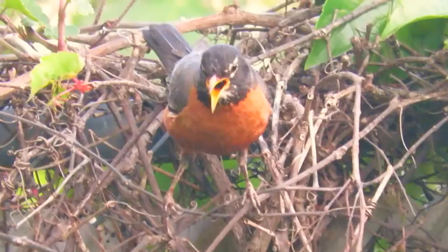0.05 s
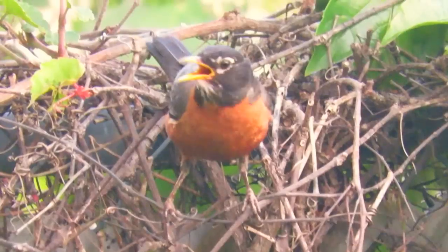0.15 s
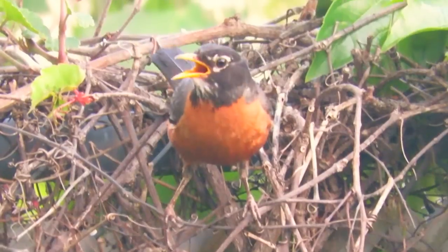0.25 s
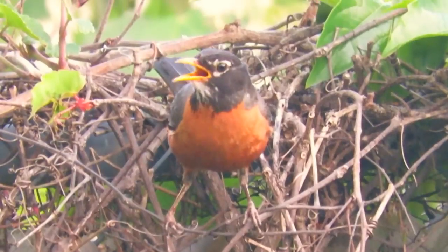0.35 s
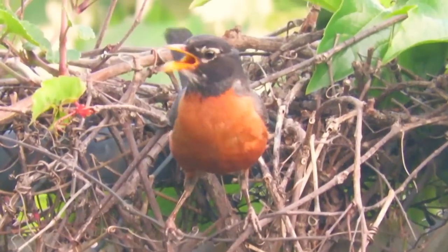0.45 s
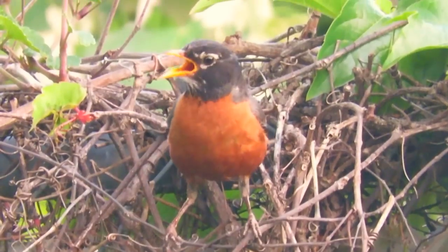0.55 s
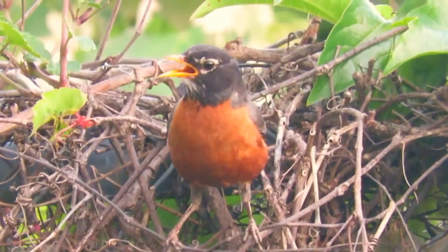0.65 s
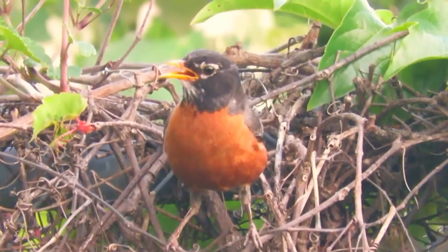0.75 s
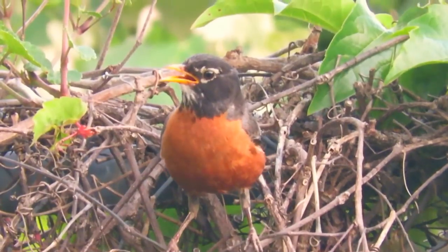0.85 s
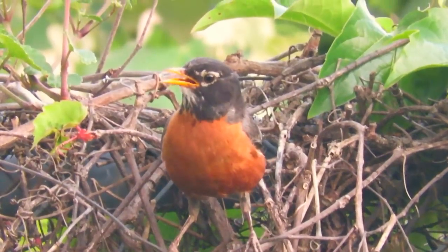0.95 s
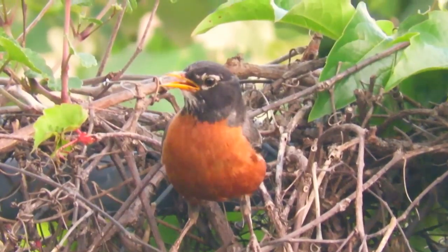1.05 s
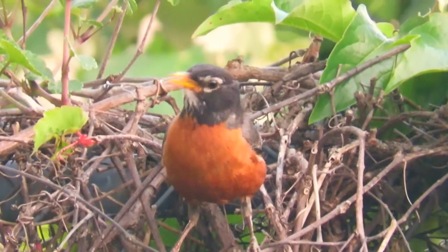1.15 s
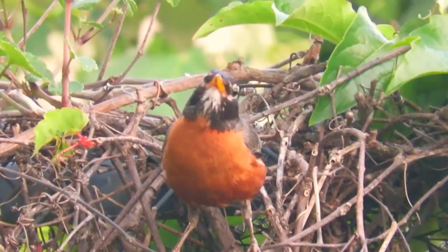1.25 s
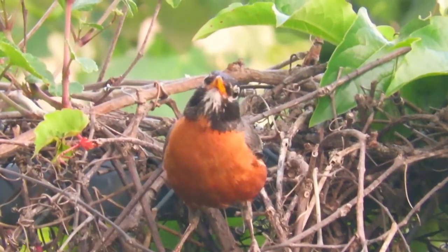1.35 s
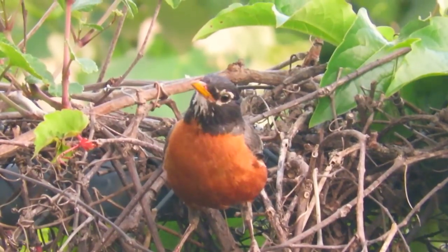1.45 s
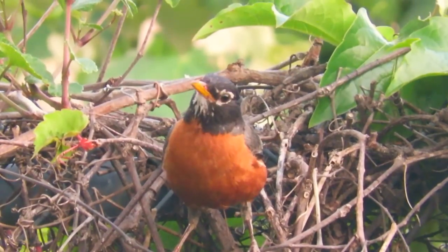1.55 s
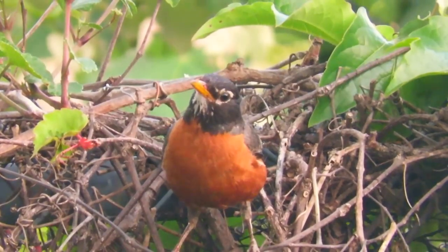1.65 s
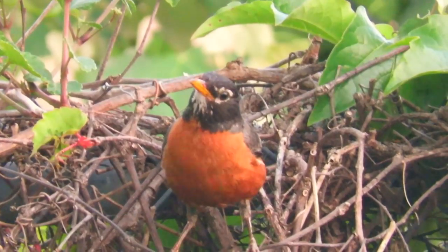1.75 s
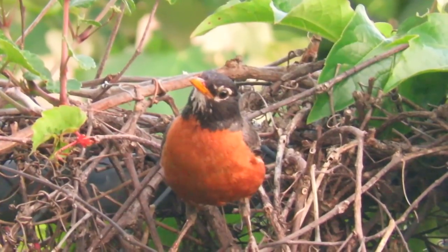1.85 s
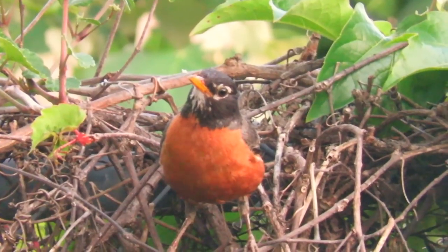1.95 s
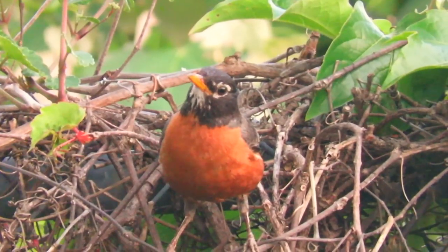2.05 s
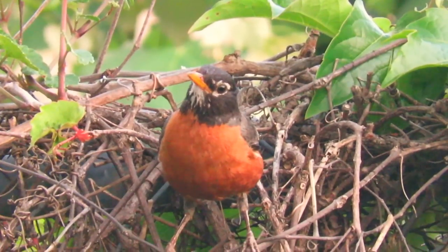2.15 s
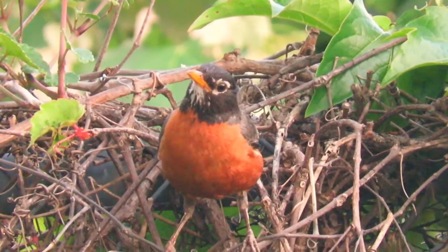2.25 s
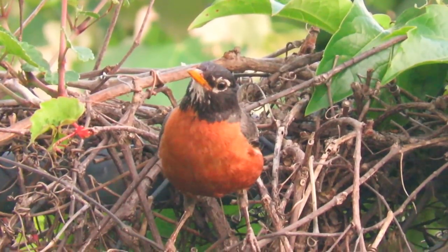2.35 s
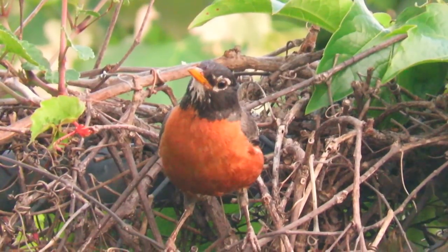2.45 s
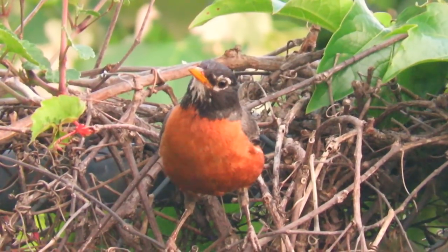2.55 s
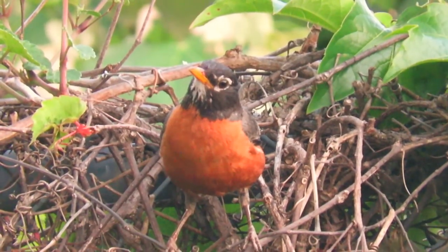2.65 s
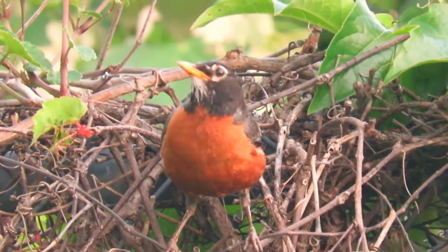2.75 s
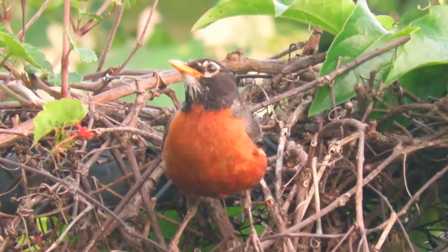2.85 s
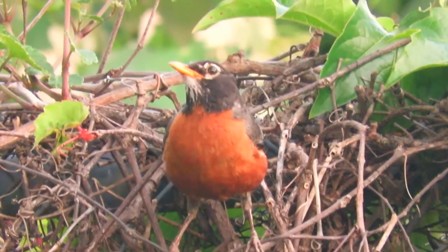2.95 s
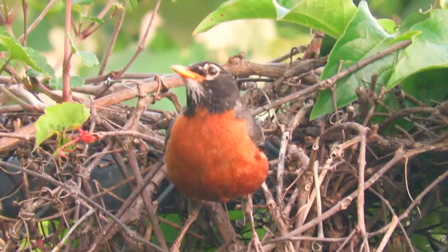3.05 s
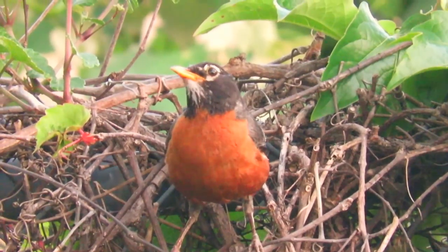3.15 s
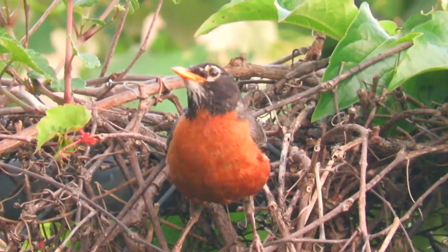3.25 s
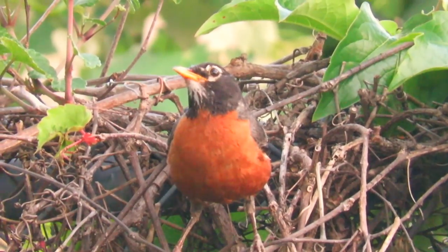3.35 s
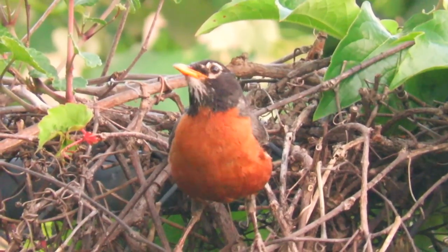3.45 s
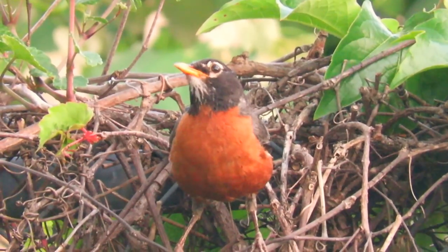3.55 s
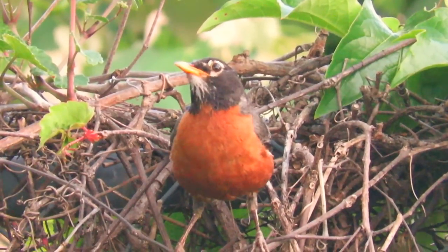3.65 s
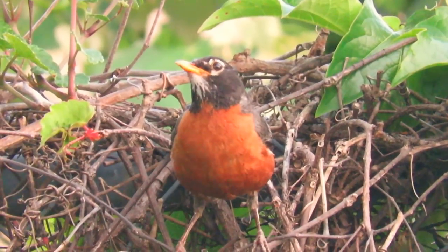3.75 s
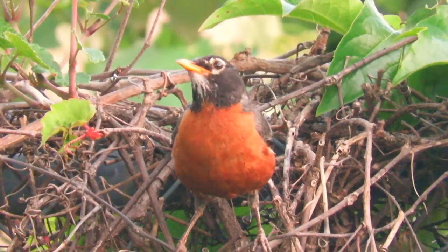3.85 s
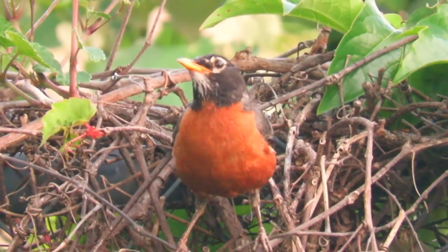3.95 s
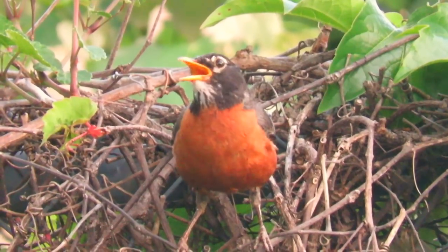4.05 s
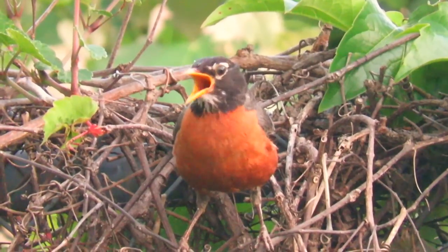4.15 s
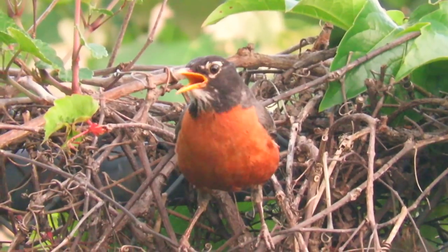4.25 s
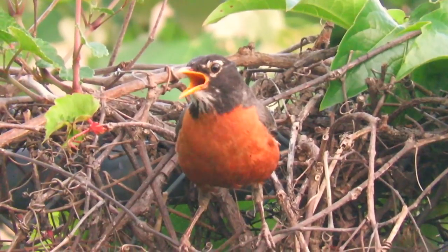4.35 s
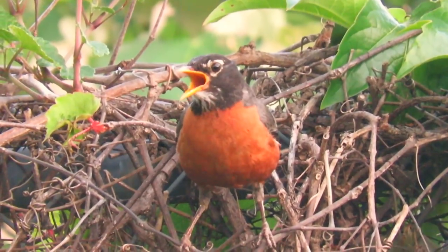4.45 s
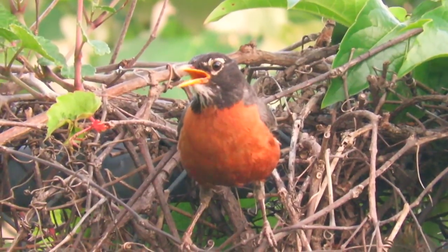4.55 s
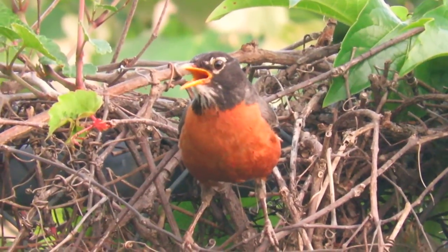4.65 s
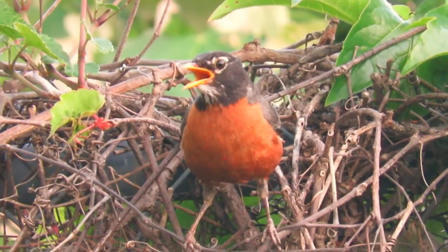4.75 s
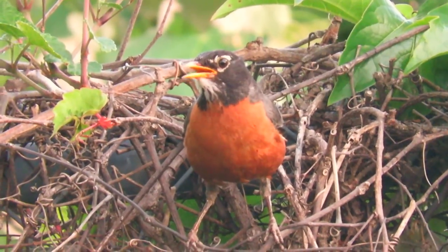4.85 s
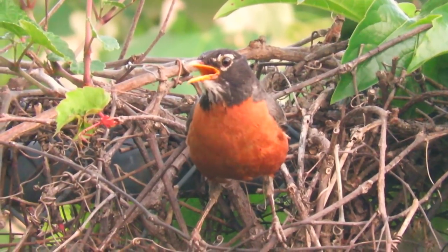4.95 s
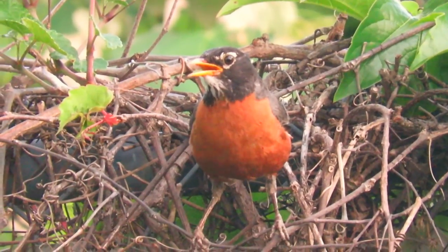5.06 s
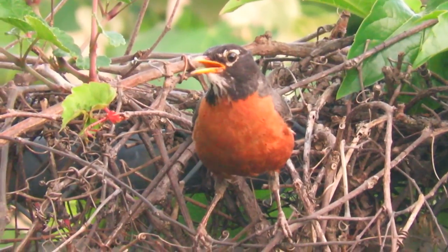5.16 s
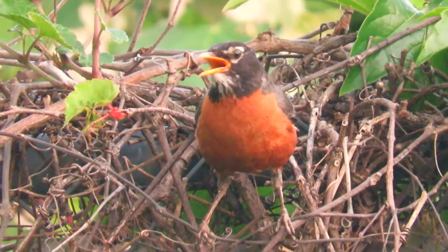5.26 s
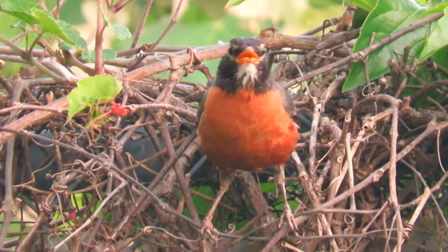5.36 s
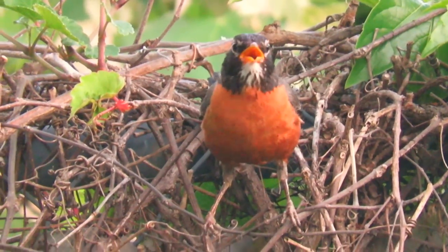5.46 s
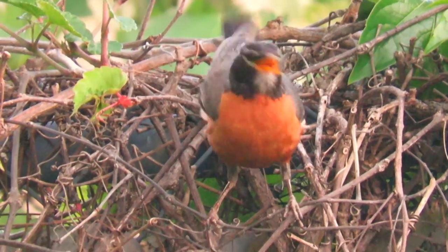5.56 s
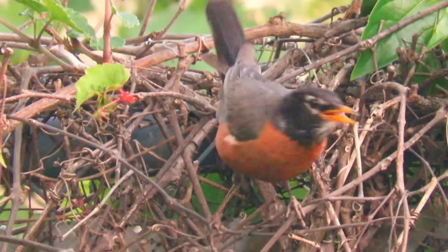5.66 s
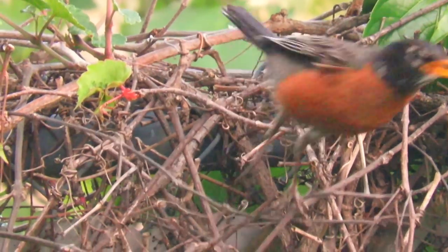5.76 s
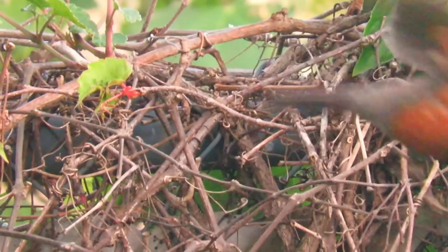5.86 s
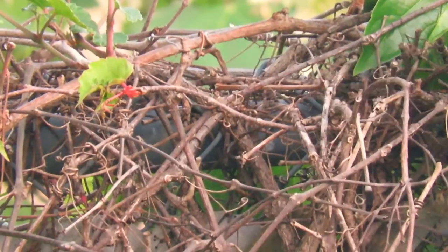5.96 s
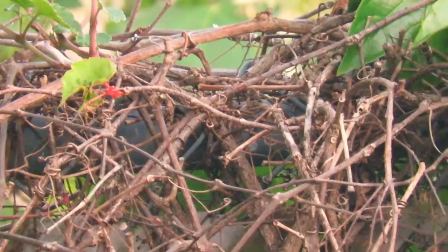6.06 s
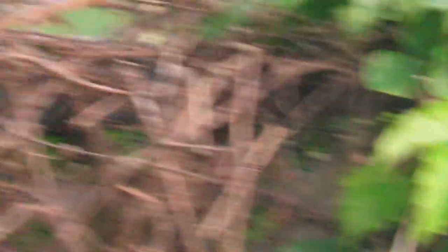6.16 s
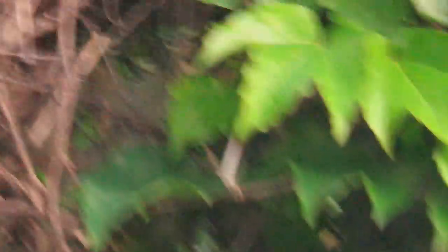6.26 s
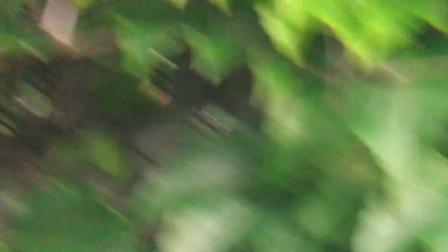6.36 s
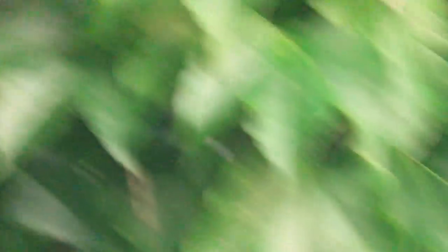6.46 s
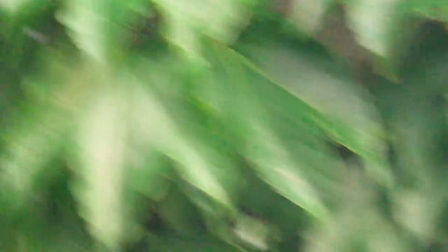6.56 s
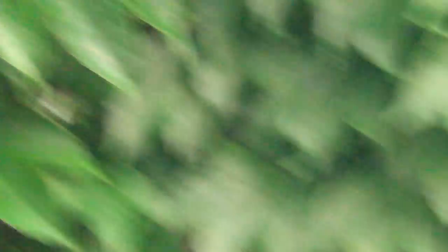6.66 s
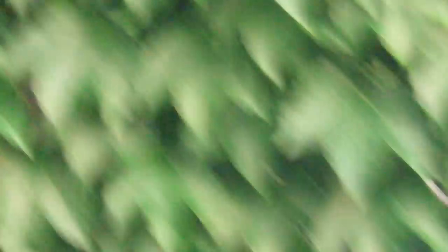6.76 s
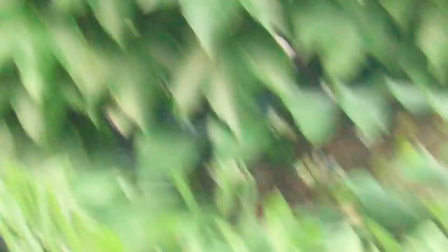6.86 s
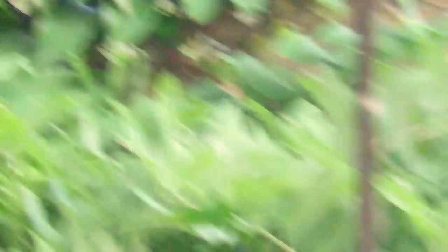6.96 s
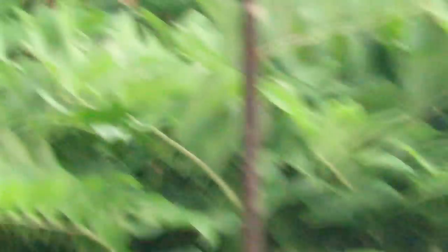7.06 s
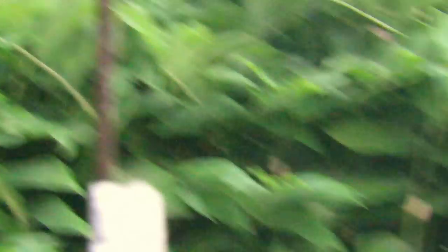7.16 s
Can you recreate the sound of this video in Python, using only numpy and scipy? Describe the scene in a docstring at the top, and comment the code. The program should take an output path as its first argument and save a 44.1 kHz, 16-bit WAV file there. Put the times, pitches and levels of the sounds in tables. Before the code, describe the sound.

A low wash of distant traffic, a machine hum and a very faint insect run throughout in a small walled yard. Right from the start, a robin a few metres away gives about eleven sharp, slightly hoarse chucks, roughly eight a second, fading by 1.3 seconds. From 1.4 to 4.1 seconds only faint chirps and thin whistles of far birds rise from the background, with a tiny tick on the camera near 3.6. At 4.2 seconds the robin starts about thirteen shrill, raspy shrieks, a little slower, weakening toward 6.1 seconds. The notes carry short, light reflections from twigs and wall. Two softer, lower clucks follow at about 6.3 and 6.7 seconds. Small ticks and a light thud on the camera body come around 6.4 to 6.5 seconds, and a faint lens motor hiss continues until the end, just after 7 seconds.

```python
"""A walled yard, a few metres from a tangle of vines. A robin gives a run of chucks and a run of
shrieks, flies off and clucks twice. The two membranes of its voice box oscillate at once, each a
gliding tone with harmonics. A broad, hissy rasp lies within each note; twigs, ground and wall
reflect the notes. Traffic wash, a machine hum, an insect and far birds lie beneath. A camera body
is knocked lightly, and its lens motor hisses at the end."""
import sys
import numpy as np
from scipy import signal
from scipy.fft import rfft, irfft
from scipy.io import wavfile
from scipy.ndimage import uniform_filter1d

SR = 44100
rng = np.random.default_rng(int(sys.argv[2]) if len(sys.argv) > 2 else 0)


def dump_mix(stems):
    """Bounce the given channels to the path in sys.argv[1] as a 16-bit WAV at rate SR."""
    frames = np.atleast_2d(stems).T  # one column per channel
    limited = np.clip(frames, -1, 1)  # hard clip at full scale
    pcm = np.round(limited * 32767).astype(np.int16)
    wavfile.write(sys.argv[1], SR, pcm)


N = 317961

# traffic spectrum: (frequency [Hz], relative density [dB])
TRAFFIC = [(15, -44.5), (25, -22.5), (59, 0), (169, -9), (198, -3), (233, -13), (267, -6.5), (445, -19),
           (762, -14), (1380, -20.5), (2060, -25), (2850, -27), (3440, -30.5), (13200, -49), (15500, -81)]
# likeness of left and right in the wash: (frequency [Hz], correlation [-1 to 1])
COHERENCE = [(60, 1.0), (180, 0.98), (550, 0.74), (1650, 0.77), (4970, -0.18), (15000, -1.01)]
# colour the wash takes on as the camera swings round: (frequency [Hz], gain [dB])
TURNED_COLOUR = [(30, 6), (200, -3), (400, 8), (600, -6.5), (1100, -3.5), (2000, -1.5), (8000, 1.5)]
# progress of that change: (time [s], share [0-1])
TURN = [(6.3, 0), (6.6, .3), (6.8, .8), (7.21, 1)]
# machine lines, then the insect: (frequency [Hz], width [Hz], level [dB], steady share [0-1])
HUM_LINES = [(56.8, 8.3, -49.5, 0.54), (118, 10.2, -51, 0.55), (237, 5.3, -50, 0.67),
             (354.6, 11.6, -61, 0.29), (815, 14, -61, 0.23), (1359, 16.3, -61, 0.36), (2858, 91, -64.5, 0)]

# note shapes, one curve a membrane: (time in note [s], base pitch [Hz], relative level [dB])
CHUCK = [
    [(0, 1960, -16), (.010, 2240, -16), (.021, 2400, -19), (.026, 2607, -6), (.032, 2700, -4),
     (.043, 2740, 0), (.050, 2720, -6), (.056, 2640, -18)],
    [(.006, 2460, -26), (.018, 3300, -19.5), (.024, 3846, -13.5), (.031, 4080, -15), (.042, 3440, -17),
     (.052, 2400, -14), (.058, 1880, -14)],
]
SHRIEK = [
    [(0, 1700, -22), (.012, 2050, -20), (.016, 2740, -9), (.032, 2800, -2)],
    [(.018, 2500, -26), (.031, 3000, -26), (.037, 4250, 0), (.042, 4390, 1), (.049, 4420, 0),
     (.056, 4340, -6), (.061, 4000, -1), (.065, 3760, -2), (.076, 3580, -8), (.079, 2800, 1),
     (.085, 2500, -6), (.094, 1850, -24)],
]
CLUCK = [
    [(0, 1804, -13), (.012, 1920, 12), (.022, 1830, -2), (.040, 1290, 9)],
    [(0, 2420, -3), (.010, 3080, -8), (.018, 3250, -7), (.030, 2564, -1), (.040, 2000, -31)],
]
# the second harmonic shifts from an opening level to a later one, usually weaker; one row a membrane:
# (time of shift [s], opening base level [dB], later base level [dB])
CHUCK_SHIFT = [(0.0225, 9.5, -41.5), (0.0075, -53, -26)]
SHRIEK_SHIFT = [(0.017, -8, -24.5), (0.036, 11, -30)]
CLUCK_SHIFT = [(.005, -12, -31), (.005, -29, -44)]
# timbre: (overtone decay [dB/s], second harmonic per treble [dB/dB], rasp gain [dB],
# second harmonic gained in flight [dB/s], pitch flutter [share], level flutter [dB])
CHUCK_TIMBRE = (120, 0.7, 3, 0, .011, 2.4)
SHRIEK_TIMBRE = (150, 0.3, -3, 24, .007, 2.8)
CLUCK_TIMBRE = (50, 0.063, 1, 0, .025, 3.2)
# notes sung: (time [s], length [factor], pitch [factor], first membrane gain [dB],
# second membrane gain [dB], treble gain [dB], growth through the note [dB])
CHUCKS = [(.030, 1.02, 0.96, -13.5, -13, -3.5, 10), (.137, 1.08, 1.0, -13.5, -12, 0.5, 6.5),
          (.256, 1.02, 1.0, -12, -13, 0.1, 6.5), (.372, 1.0, 1.0, -11.5, -11.5, 0.8, 6.5),
          (.490, 1.0, 1.0, -12, -13, -2.3, 6.5), (.609, 1.03, 0.99, -14, -14.5, -2.2, 7.5),
          (.731, 0.97, 0.99, -15.5, -14, -2, 7.5), (.854, .95, 0.99, -15, -17, -8.5, 9),
          (.979, 0.96, 0.99, -15.5, -20, -12, 9), (1.106, 0.96, 0.97, -16.5, -22, -13.5, 12),
          (1.245, 0.9, 0.92, -20, -23, -16, 12)]
SHRIEKS = [(4.186, 1.076, 0.96, -23, -18.5, 1, -2), (4.323, 1.08, 0.98, -17.5, -17, 8, .1),
           (4.467, 1.075, 0.97, -17, -17.5, 7, .1), (4.613, 1.077, 0.97, -19, -18.5, 8, 1),
           (4.761, 1.06, 0.97, -17, -18.5, 4, -0.5), (4.916, 1.06, 0.97, -20.5, -21.5, 3.5, 1),
           (5.072, 1.1, 0.97, -22.5, -24, 0, 0), (5.236, 1.11, 0.95, -22.5, -24, -2, 4),
           (5.394, 1.02, 0.94, -22.5, -23, 1.5, 6), (5.562, 1.09, 0.955, -23.5, -24, -2, 5),
           (5.727, 1.13, 0.935, -31, -29.5, -1, 12), (5.901, 1.12, .95, -33, -29, 3.5, 0),
           (6.062, 1.075, 0.95, -24, -21, 0.5, -12)]
CLUCKS = [(6.338, 1.01, .97, -41.5, -34, .1, -.3), (6.669, 1.05, .88, -50, -37, .1, 7.8)]
# beak response for the third and fourth harmonics: (frequency [Hz], gain [dB])
BEAK = [(5000, -44), (7000, -40), (8500, -43), (9700, -55), (10800, -34), (13300, -32), (14500, -46),
        (16000, -55)]
# spectra of the broad, hissy rasp and the puff in a note: (frequency [Hz], relative density [dB])
RASP = [(1500, -19), (3000, 13.5), (5000, 5), (8000, -1.5), (9700, -7.5), (12000, 1.5), (16000, -31)]
PUFF = [(9500, -16), (12000, -15), (13700, -6), (15500, -13)]
# where the bird faces: (time [s], left over right [dB])
FACING = [(0, 0), (1.3, 0), (4.2, 0), (4.8, 0), (5.1, 0.5), (6.4, -0.5)]

# early reflections: (delay [s], left gain [dB], right gain [dB])
ECHOES = [(.0018, -12, -11), (.0028, -15, -14), (.0039, -18, -16), (.0048, -17, -16), (.0054, -17, -15),
          (.0108, -22, -21)]
# colour of the scatter from twigs and leaves: (frequency [Hz], relative level [dB])
SCATTER = [(1500, 13), (2700, 7), (3600, 17), (4300, 9), (5000, 16.5), (8000, 13), (12000, 5)]
# decay of the scatter: (frequency [Hz], time to fall 60 dB [s])
REVERB_TIME = [(1500, 0.17), (2700, 0.37), (4000, 0.31), (7000, 0.28), (12000, 0.22)]

# far calls: (time [s], length [s], first pitch [Hz], last pitch [Hz], width [Hz], level [dB])
FAR_CALLS = [(1.44, .1, 3150, 3250, 90, -60), (1.735, .115, 4800, 3250, 350, -50.5),
             (1.89, .08, 3900, 3900, 15, -63), (2.69, .1, 3700, 3700, 90, -70),
             (2.915, .04, 4250, 4220, 50, -63.5), (3.01, .04, 4250, 4220, 50, -64.5),
             (3.11, .04, 4230, 4200, 40, -64), (3.22, .05, 4200, 4150, 70, -66),
             (3.33, .05, 4200, 4180, 40, -65), (3.465, .05, 5250, 5350, 300, -67),
             (3.705, .06, 3850, 3300, 120, -61), (3.84, .2, 6300, 6280, 60, -75),
             (4.055, .115, 4600, 3250, 350, -53)]
# knocks on the camera body: (time [s], gain [dB], time to fall 60 dB [s], thud share [0-1],
# low edge of tick [Hz], high edge [Hz])
KNOCKS = [(3.583, -47, .2, .03, 1800, 3300), (3.585, -58, .2, 0, 6500, 9000),
          (6.375, -44, .03, 0, 5500, 8800), (6.384, -43, .025, 0, 5500, 8800),
          (6.472, -34, .02, 0, 1200, 4200), (6.472, -21, .06, 1, 1200, 3500)]
# spectrum of the motor's hiss: (frequency [Hz], relative density [dB])
MOTOR_HISS = [(1500, 1), (2500, 0), (4500, -5.5), (8400, -12), (9300, -31), (11500, -35), (13500, -6.5),
              (14800, -18), (16000, -33)]
# envelope of the motor: (time [s], level [dB])
MOTOR_ENVELOPE = [(6.299, -103), (6.35, -48), (6.4, -50.5), (6.7, -53.5), (6.8, -56), (7.21, -56)]
# gear tones: (frequency [Hz], width [Hz], level relative to the hiss [dB])
GEARS = [(784, 78, -18), (1480, 68, -11), (1860, 190, -6), (2036, 44, -7.5), (2550, 62, -17)]

TRAFFIC_DB = -43
SHIFT_WIDTH_S, TAKE_OFF_S = .0017, 5.96
RASP_DB, RASP_SWELL_S, RASP_FADE_DB_PER_S = -16, .012, 121
BLUR, BLUR_HZ = .4, 350  # share and width of the roughness on the overtones
SUM_TONE_DB, CHUCK_HOARSENESS = -31, 1.5  # hoarseness multiplies the second membrane's flutter
BUSH_S, BUSH_DB = .027, -9  # the bush the bird flies into echoes its clucks
WALL_S, WALL_DB = .049, -17
BODY_S, BODY_HZ, BODY_DB = .003, 7000, -6  # treble smeared by the camera body


def gain_of(db):
    """Amplitude ratio of a level in decibels."""
    return 10 ** (np.asarray(db) / 20)


def unit_rms(x):
    """Normalisation to unit mean power."""
    return x / np.sqrt(np.mean(x ** 2) + 1e-20)


def spectrum_at(points, hz):
    """Interpolation on a logarithmic frequency axis."""
    f, value = np.transpose(points)
    return np.interp(np.log(hz + 1), np.log(f + 1), value)


def add(mix, s, sound, pan_db=0):
    """Superposition of a sound at s seconds, placed by a left-right level difference."""
    part = mix[:, round(s * SR):][:, :len(sound)]
    part += sound[:part.shape[1]] * gain_of([[pan_db / 2], [-pan_db / 2]])


def coloured(points, shape):
    """Spectral shaping of white noise, rms 1."""
    gain = gain_of(spectrum_at(points, np.fft.rfftfreq(shape[-1], 1 / SR)))
    return unit_rms(irfft(rfft(rng.standard_normal(shape)) * gain, shape[-1]))


def wobble(size, cutoff_hz):
    """Random modulation: low-passed noise, rms 1."""
    lowpass = signal.butter(2, cutoff_hz, fs=SR, output="sos")
    return unit_rms(signal.sosfilt(lowpass, rng.standard_normal(size + 2000))[2000:])


def narrowband(hz, width_hz, size):
    """Random modulation in quadrature broadens a tone into a band."""
    phase = 2 * np.pi * np.cumsum(hz * np.ones(size)) / SR
    in_phase, quadrature = wobble(size, width_hz / 2), wobble(size, width_hz / 2)
    return unit_rms(in_phase * np.cos(phase) + quadrature * np.sin(phase))


def traffic_wash():
    """Traffic gives broadband noise, partly coherent between left and right, its level drifting."""
    frames, hz = N // 256 + 5, np.fft.rfftfreq(1024, 1 / SR)
    a, b, c, d, patches = rng.standard_normal((frames, 513, 5)).T
    patches = unit_rms(uniform_filter1d(uniform_filter1d(patches, 8, 0), 14, 1))
    swell = unit_rms(uniform_filter1d(rng.standard_normal(frames), 40))
    coherence = np.clip(spectrum_at(COHERENCE, hz), -1, 1)[:, None]
    left, independent = a + 1j * b, c + 1j * d
    spectra = np.array([left, coherence * left + np.sqrt(1 - coherence ** 2) * independent])
    turned = np.interp(np.arange(frames) * 256 / SR, *np.transpose(TURN))
    spectra *= gain_of(spectrum_at(TURNED_COLOUR, hz)[:, None] * turned)
    spectra *= gain_of(spectrum_at(TRAFFIC, hz)[:, None] + 1.23 * patches + .6 * swell)
    wash = signal.istft(spectra, nperseg=1024, noverlap=768)[1][:, :N]
    return gain_of(TRAFFIC_DB) * unit_rms(wash)


def machine_and_insect():
    """A line spectrum: part steady, part wavering tones of a far machine under an insect's band."""
    out, t = np.zeros(N), np.arange(N) / SR
    for hz, width_hz, db, steady in HUM_LINES:
        tone = np.sqrt(2) * np.cos(2 * np.pi * hz * t)
        out += gain_of(db) * unit_rms((1 - steady) * narrowband(hz, width_hz, N) + steady * tone)
    return out


def membrane(curve, shift, timbre, flown_s, stretch, pitch, db, treble_db, growth_db, hoarse=1):
    """Nonlinear oscillation gives a glide with harmonics; returns the sound and the bare swing."""
    s, *columns = np.transpose(curve)
    shift_s, opening_db, later_db = shift
    fade_db_per_s, per_treble, rasp_db, flight_db_per_s, flutter, flutter_db = timbre
    t = np.arange(0, .12, 1 / SR) / stretch
    hz, level_db = (uniform_filter1d(np.interp(t, s, c), 70, mode="nearest") for c in columns)
    opening = 1 / (1 + np.exp((t - shift_s) / SHIFT_WIDTH_S))
    hz = hz * pitch * (1 + (hoarse * flutter + .022 * opening) * wobble(len(t), 350))
    swing = np.exp(2j * np.pi * np.cumsum(hz) / SR)
    # the even harmonics and the rasp shift in level together
    richness_db = later_db + (opening_db - later_db) * opening
    second = gain_of(richness_db + per_treble * treble_db + flight_db_per_s * flown_s) * swing ** 2
    third = gain_of(spectrum_at(BEAK, 3 * hz)) * swing ** 3
    fourth = gain_of(spectrum_at(BEAK, 4 * hz) + richness_db + 22) * swing ** 4
    rasp = coloured(RASP, t.shape) * np.clip((t - s[0]) / RASP_SWELL_S, 0, 1) ** 2
    rasp *= gain_of(RASP_DB + rasp_db + .47 * richness_db - RASP_FADE_DB_PER_S * (t - .0677))
    roughness = (wobble(len(t), BLUR_HZ) + 1j * wobble(len(t), BLUR_HZ)) / np.sqrt(2)
    fading = (1 - BLUR + BLUR * roughness) * gain_of(-fade_db_per_s * np.maximum(t - shift_s, 0))
    treble = gain_of(treble_db) * (fading * (third + fourth) + rasp)
    tone = swing + (opening + (1 - opening) * fading) * second + treble
    level_db += db + growth_db * np.interp(t, s[[0, -1]], [-.5, .5])
    level_db += hoarse * flutter_db * wobble(len(t), 220)
    envelope = gain_of(level_db) * np.clip(np.minimum(t - s[0], s[-1] - t) / .003, 0, 1)
    return envelope * tone.real, np.sqrt(envelope) * swing


def robin():
    """Two coupled membranes tug at each other, adding a combination tone at their summed pitch."""
    out = np.zeros((2, N))
    kinds = ((CHUCK, CHUCK_SHIFT, CHUCK_TIMBRE, CHUCKS),
             (SHRIEK, SHRIEK_SHIFT, SHRIEK_TIMBRE, SHRIEKS),
             (CLUCK, CLUCK_SHIFT, CLUCK_TIMBRE, CLUCKS))
    for shape, shift, timbre, notes in kinds:
        hoarse = CHUCK_HOARSENESS if shape is CHUCK else 1
        for s, stretch, pitch, first_db, second_db, treble_db, growth_db in notes:
            flown_s = max(s - TAKE_OFF_S, 0)
            # the first membrane's pitch sags less than the second's as effort drops
            first, first_swing = membrane(shape[0], shift[0], timbre, flown_s, stretch,
                                          pitch ** .6, first_db, treble_db, growth_db)
            second, second_swing = membrane(shape[1], shift[1], timbre, flown_s, stretch,
                                            pitch, second_db, treble_db, growth_db, hoarse)
            note = first + second + gain_of(SUM_TONE_DB) * (first_swing * second_swing).real
            add(out, s, note, np.interp(s, *np.transpose(FACING)))
            if shape is CLUCK:
                add(out, s + BUSH_S, gain_of(BUSH_DB) * note)
    return out


def puffs(db=-58, delay_s=.016, length_s=.066):
    """Amplitude-modulated noise: a faint swell of high hiss rides on each chuck and shriek."""
    out, swell = np.zeros((2, N)), signal.windows.hann(round(length_s * SR))
    for s, *_ in CHUCKS + SHRIEKS:
        add(out, s + delay_s, gain_of(db) * swell * coloured(PUFF, swell.shape))
    return out


def twig_scatter(db=-8.5):
    """Scattering by twigs and leaves: an impulse response of sparse taps, decaying band by band."""
    taps = np.zeros((2, SR // 3))
    slots = np.arange(100, SR // 3 - 20, 20)
    arrivals = slots + rng.integers(0, 20, (2, len(slots)))
    np.put_along_axis(taps, arrivals, rng.choice([-1., 1.], arrivals.shape), 1)
    taps[1] = .47 * taps[0] + .77 * taps[1]  # close microphones share much of the scatter
    hz, t, spectra = signal.stft(taps, SR, nperseg=256)
    level_db = spectrum_at(SCATTER, hz)[:, None] - 60 * t / spectrum_at(REVERB_TIME, hz)[:, None]
    tail = signal.istft(spectra * gain_of(level_db), SR, nperseg=256)[1]
    return tail * gain_of(db) / np.linalg.norm(tail, axis=1)[:, None]


def yard_reflections(calls, head_turn_hz=1.3):
    """Multipath propagation: direct sound, early reflections, a dull wall echo and scatter."""
    response = np.zeros((2, 3000))
    response[:, 0] = 1
    dull = signal.windows.hann(9)
    response[:, round(WALL_S * SR):][:, :len(dull)] = gain_of(WALL_DB) * dull / dull.sum()
    for s, *db in ECHOES:
        response[:, round(s * SR)] = gain_of(db)
    # the camera body smears the treble with opposite sign at the two microphones
    t = np.arange(600) / SR
    smear = rng.standard_normal(len(t)) * np.exp(-t / BODY_S)
    highpass = signal.butter(3, BODY_HZ, "high", fs=SR, output="sos")
    smear = signal.sosfilt(highpass, smear / np.linalg.norm(smear))
    response[:, :len(t)] += gain_of(BODY_DB) * np.outer([1, -1], smear)
    out = signal.oaconvolve(calls, response, axes=1)[:, :N]
    # the turning head feeds three scatter paths in rotation
    angle = 2 * np.pi * head_turn_hz * np.arange(N) / SR
    for k in range(3):
        facing = np.cos(angle + k * np.pi / 3) / np.sqrt(1.5)
        out += signal.oaconvolve(calls * facing, twig_scatter(), axes=1)[:, :N]
    return out


def far_birds():
    """Frequency glides, quick at first: narrow bands are whistles, wide ones hoarse chirps."""
    out = np.zeros((2, N))
    for s, length_s, first_hz, last_hz, width_hz, db in FAR_CALLS:
        progress = np.linspace(0, 1, round(length_s * SR))
        hz = last_hz + (first_hz - last_hz) * (1 - progress) ** 3
        envelope = gain_of(db) * signal.windows.tukey(len(hz), .4)
        add(out, s, envelope * narrowband(hz, width_hz, len(hz)))
    return out


def knocks(thud_hz=260):
    """Impacts on the camera body excite a noisy tick or a low thud, damped exponentially."""
    out, t = np.zeros((2, N)), np.arange(6000) / SR
    for s, db, t60, thud_share, low_hz, high_hz in KNOCKS:
        band = [(.7 * low_hz, -25), (low_hz, 0), (high_hz, -9), (1.3 * high_hz, -30)]
        tick = coloured(band, t.shape) * (.5 + np.exp(-t / .0015))
        thud = np.sin(2 * np.pi * thud_hz * t) * np.clip(t / .008, 0, 1) ** 2
        knock = (1 - thud_share) * tick + thud_share * thud
        add(out, s, knock * gain_of(db - 60 * t / t60))
    return out


def lens_motor():
    """Machine noise inside the body: hiss, incoherent between the sides, and narrowband gear whirr."""
    s, level_db = np.transpose(MOTOR_ENVELOPE)
    t = np.arange(round(s[0] * SR), N) / SR
    whirr = sum(gain_of(db) * narrowband(hz, width_hz, len(t)) for hz, width_hz, db in GEARS)
    sound = (coloured(MOTOR_HISS, (2, len(t))) + whirr) * gain_of(np.interp(t, s, level_db))
    return np.pad(sound, ((0, 0), (N - len(t), 0)))


def scene():
    """Superposition: the birds with their reflections, and the other sources heard directly."""
    birds = yard_reflections(robin() + puffs() + far_birds())
    return birds + knocks() + traffic_wash() + machine_and_insect() + lens_motor()


def record(dry):
    """Gating and band limiting: the sound sets in after a short silence and is low-passed."""
    start_s, cutoff_hz = .0575, 15850
    gated = dry * (np.arange(N) > start_s * SR)
    lowpass = signal.firwin(511, cutoff_hz, window=("kaiser", 9), fs=SR)
    return signal.oaconvolve(gated, lowpass[None], "same")


dry = scene()
out = record(dry)
dump_mix(out)
```